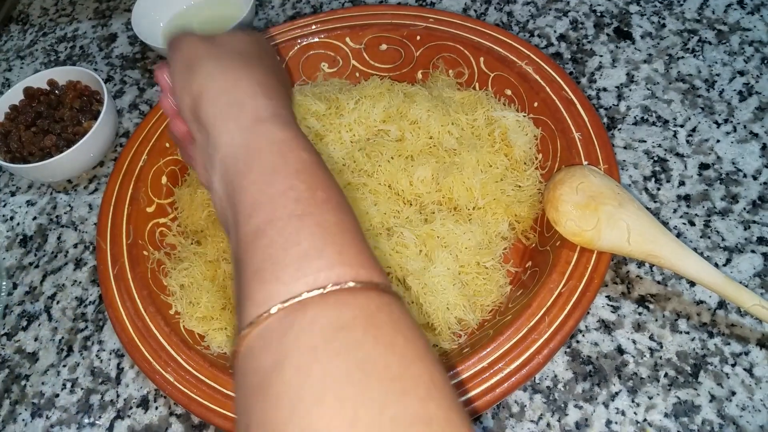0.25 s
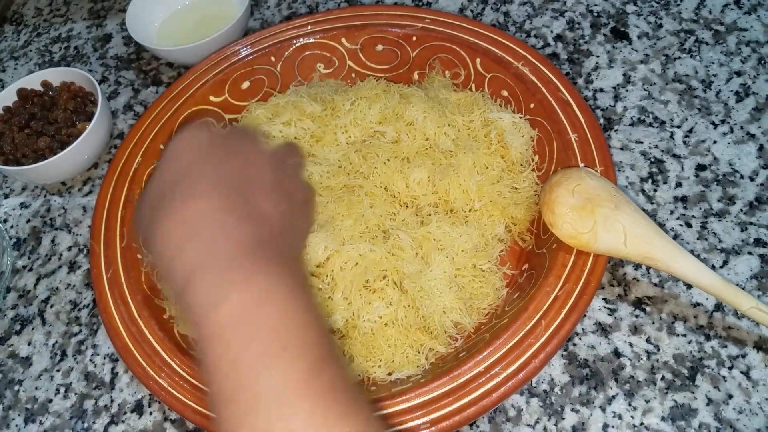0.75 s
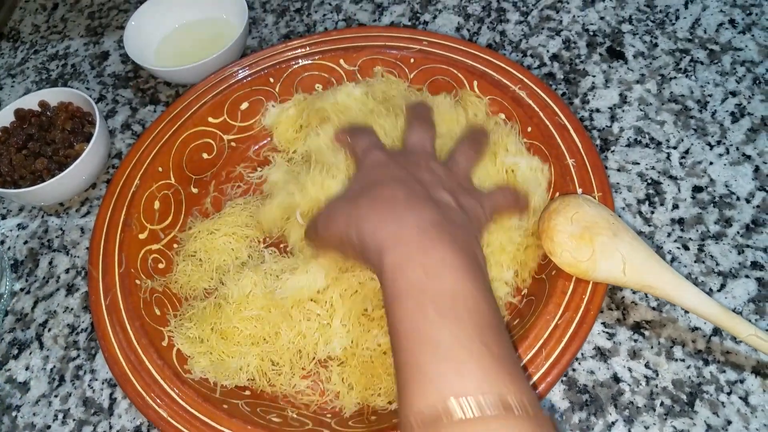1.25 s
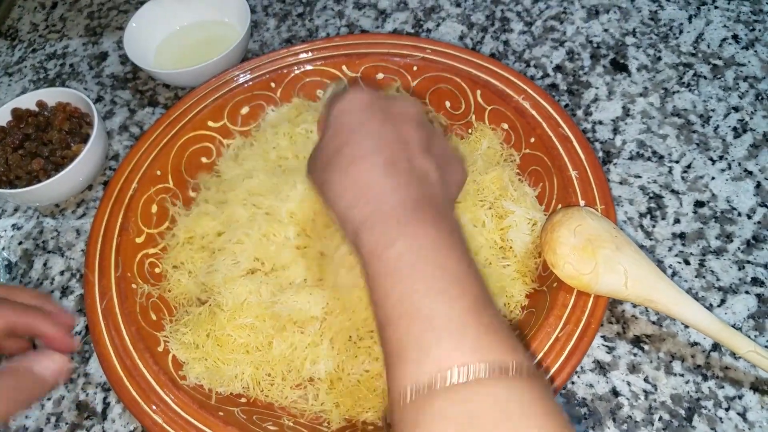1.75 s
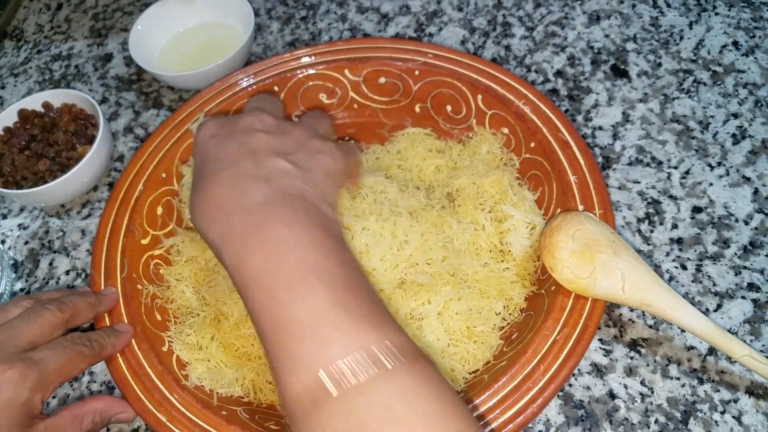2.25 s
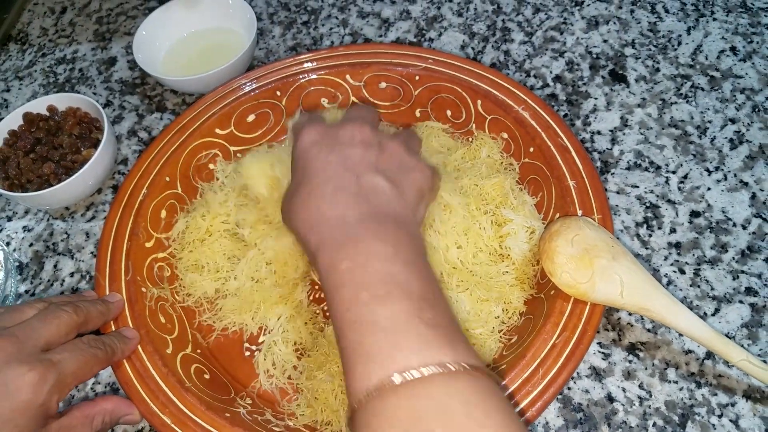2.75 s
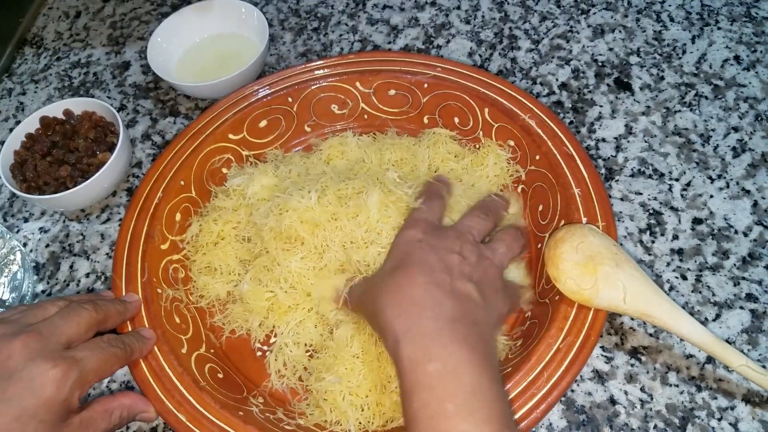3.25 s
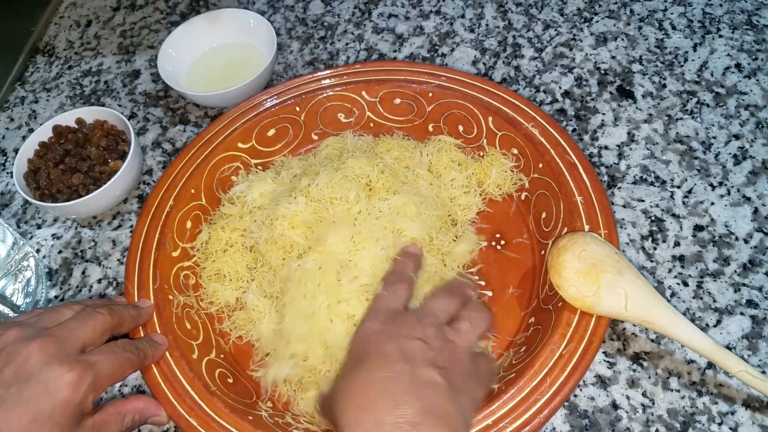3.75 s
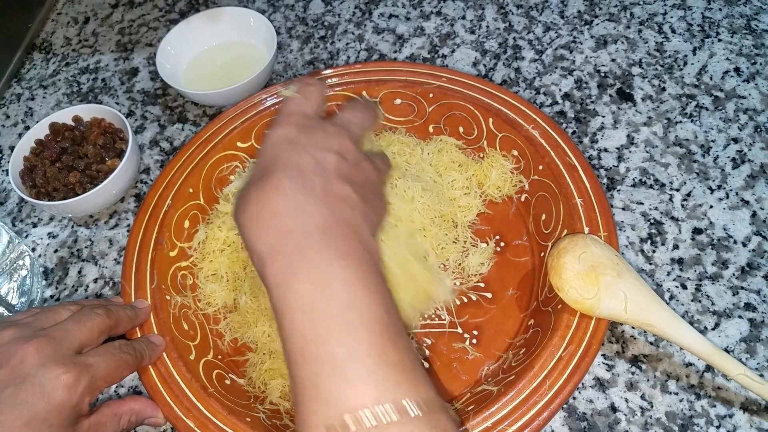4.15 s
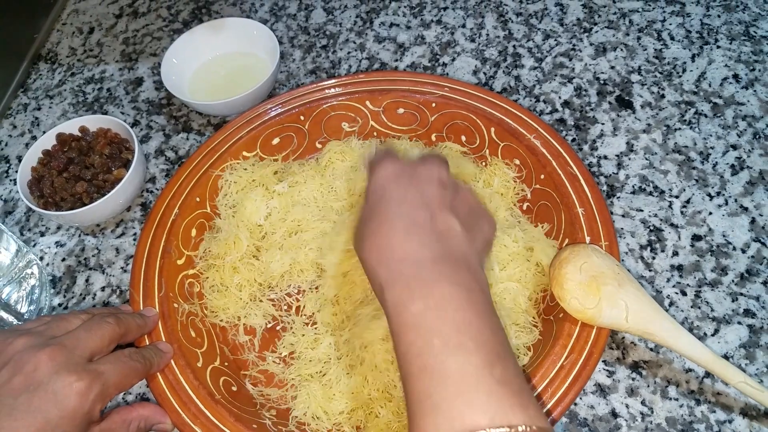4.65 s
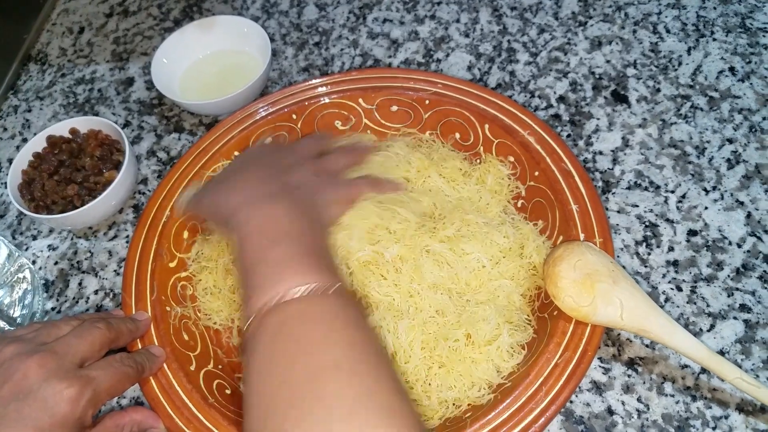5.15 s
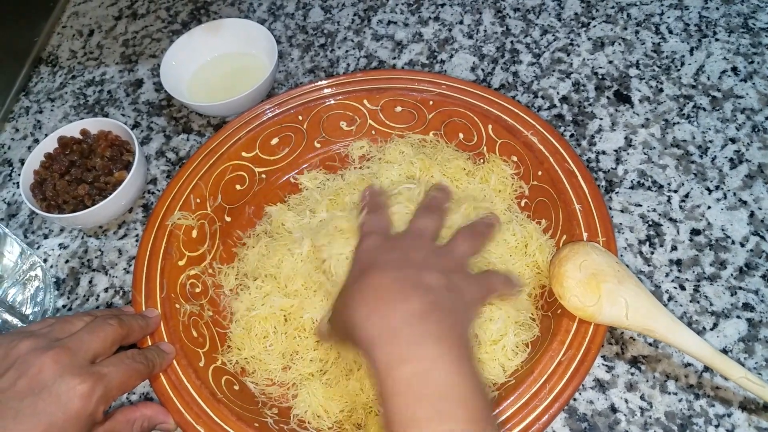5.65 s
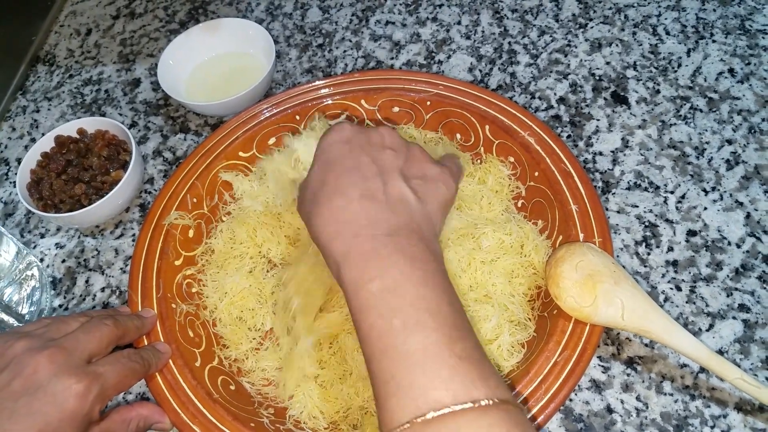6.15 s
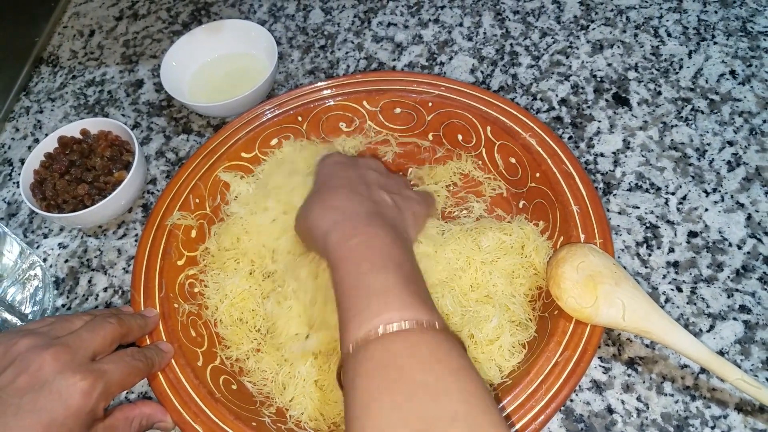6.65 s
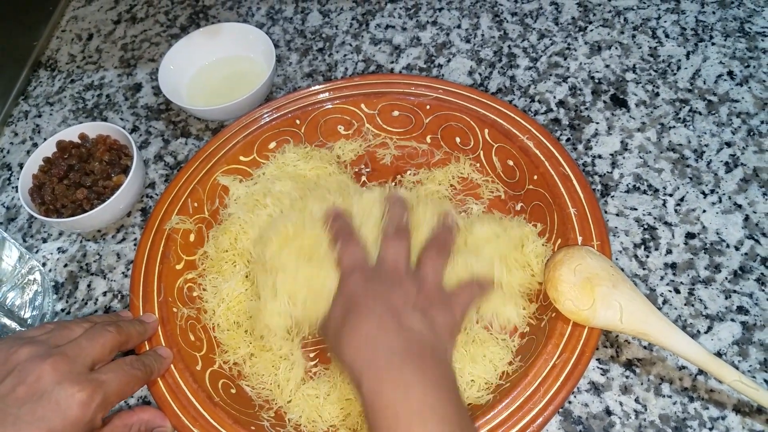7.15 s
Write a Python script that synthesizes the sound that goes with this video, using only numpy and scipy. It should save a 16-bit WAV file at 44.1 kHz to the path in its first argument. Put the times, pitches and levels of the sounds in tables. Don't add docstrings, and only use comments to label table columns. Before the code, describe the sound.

Pot and lid clank hard at the start, then quiet scrapes, rustles and finger taps on a clay dish, with a late bouncing thud.

```python
import sys
import numpy as np
from scipy import signal
from scipy.fft import rfft, irfft, next_fast_len
from scipy.io import wavfile
from scipy.ndimage import uniform_filter1d

SR = 44100
rng = np.random.default_rng(int(sys.argv[2]) if len(sys.argv) > 2 else 0)


def convert_level_to_amplitude(level_db):
    exponent = np.asarray(level_db, float) / 20
    return 10 ** exponent


def wav_out(sig):
    wavfile.write(sys.argv[1], SR, np.round(np.clip(np.atleast_2d(sig).T, -1, 1) * 32767).astype(np.int16))


N = 326117


def read(table, hz):
    table_hz, value = np.array(table)[:, 0], np.array(table)[:, 1]
    return np.interp(np.log(np.maximum(hz, 1)), np.log(table_hz), value)


def level(x, db):
    return x * convert_level_to_amplitude(db) / np.sqrt(np.mean(x ** 2))


def colour(x, table, size=16384):
    gain_db = read(table, np.fft.rfftfreq(size, 1 / SR))
    cepstrum = irfft(np.log(convert_level_to_amplitude(gain_db)), size)
    cepstrum[1:size // 2] *= 2
    cepstrum[size // 2 + 1:] = 0
    response = irfft(np.exp(rfft(cepstrum)), size)[:size // 2]
    whole = next_fast_len(x.shape[-1] + size // 2, real=True)
    return irfft(rfft(x, whole) * rfft(response, whole), whole)[..., :x.shape[-1]]


def walk(rate_hz):
    k = int(SR / rate_hz)
    held = np.repeat(rng.standard_normal(N // k + 1), k)
    return uniform_filter1d(uniform_filter1d(held, k), k)[:N]


def add(out, sound, start_s, peak_db, pan_db):
    i = int(start_s * SR)
    sound = sound[:, :N - i]
    sound = sound * convert_level_to_amplitude(peak_db) / np.abs(sound.mean(axis=0)).max()
    out[:, i:i + sound.shape[1]] += sound * convert_level_to_amplitude(np.array([[pan_db], [-pan_db]]) / 2)


# freq_hz, left_right_correlation
PORT_LIKENESS = [(60, 0.99), (130, 1), (290, 0.87), (640, 0.37), (1200, 0)]


def phase_apart(hz):
    return np.arccos(np.clip(read(PORT_LIKENESS, hz), 0, 1)) * np.array([[.5], [-.5]])


def diffuse(size, centres_hz):
    hz = np.fft.rfftfreq(size, 1 / SR)
    like = np.clip(read(PORT_LIKENESS, hz), 0, 1)
    mid, side = rfft(rng.standard_normal((2, size))) * np.sqrt([1 + like, 1 - like])
    both = np.array([mid + side, mid - side])
    shares = [read(list(zip(centres_hz, row)), hz) for row in np.eye(len(centres_hz))]
    return [irfft(both * share, size) for share in shares]


def ring(modes, t, swell_s):
    rows = np.array([(*mode, 0, 0)[:5] for mode in modes])
    hz, db, t60_s, split_hz, hush_s = rows.T[:, :, None, None]
    turn = rng.uniform(-0.9, 1, (len(modes), 4)).T[:, :, None, None]
    apart = phase_apart(hz) * np.sign(turn[0])
    waver = 1 + .45 * np.sin(2 * np.pi * 14 * turn[1] * t + np.pi * turn[2])
    beat = np.sin(np.pi * split_hz * (t - hush_s))
    settle_db = 9 * np.clip((t - .25) / .03, 0, 1)
    fade = convert_level_to_amplitude(db - 60 * t / np.minimum(t60_s, .7) - settle_db)
    tones = fade * np.where(split_hz > 0, beat, waver) * np.sin(2 * np.pi * hz * t + apart)
    return np.sum(tones, axis=0) * (1 - np.exp(-t / max(swell_s, 1e-4)))


# freq_hz, t60_s
ROOM_DECAY = [(60, 0.99), (250, 0.5), (1000, 0.4), (3000, 0.53), (8000, 0.55), (16000, 0.14)]


def room(crack_db, crack_s, tail_s):
    t = np.arange(int(tail_s * SR)) / SR
    bands = diffuse(len(t), np.array(ROOM_DECAY)[:, 0])
    tail = sum(band * convert_level_to_amplitude(-60 * t / t60_s) for band, (_, t60_s) in zip(bands, ROOM_DECAY))
    crack = convert_level_to_amplitude(crack_db) * np.sign(rng.standard_normal(len(t))) * np.exp(-t / crack_s)
    return tail * (1 - np.exp(-t / 0.00033)) + crack, t


NEAR_TAIL_S = .4


def knock(body, ring_db, swell_s, crack_db, tail_s=.7):
    modes, shape = body
    air, t = room(crack_db, .005, tail_s)
    return level(colour(air, shape), 0) + level(ring(modes, t, swell_s), ring_db)


# freq_hz, density_db
POT_WARE = [
    [(303, -17, 0.19), (353, -16.5, 0.72), (424, -40, 0.22), (482, -0.5, 0.14), (570, -30, 1), (695, -13, 0.56), (677, -25.5, 0.22), (1020, -25, 0.83), (1060, -31, 0.38), (1170, -44, 0.39), (1260, -17.5, 0.69), (1583, -41, 0.48), (1710, -35, 0.4), (1730, -32.5, 0.33), (1850, -34.5, 0.49), (2150, -21.5, 0.65), (3130, -21, 0.26), (3390, -27, 0.09), (3350, -30, 0.56), (4200, -41.5, 0.51), (4420, -32, 0.17), (5270, -46.5, 0.27)],
    [(40, -27), (120, -15), (250, -6.5), (400, -2.5), (1000, -3.5), (1400, -9.5), (2100, -12.5), (2500, -24), (3300, -32), (6000, -44), (16000, -62)],
]
LID_WARE = [
    [(104.4, -24.5, 0.28), (210, -14, 0.36), (358, 3, 0.13), (550, -6, 0.23), (620, -12, 0.3), (735, -8.5, 0.21), (840, -17, 0.52), (1010, 2, 0.11), (1200, -15, 0.088), (1340, -56, 0.93), (1404, -9.5, 0.21), (1544, -22, 0.32), (2019, -3, 0.14), (2160, -29.5, 0.76), (2630, -16.5, 0.14), (2570, -25, 0.29), (2790, -44, 0.36), (3270, -34, 0.36), (4030, -39, 0.49), (5240, -41, 0.27), (5950, -32, 0.13)],
    [(24, -69), (40, -36), (194, -10.5), (276, -15), (345, 0), (1440, -9.5), (1630, -21), (1760, -10.5), (2380, -27), (4000, -38.5), (16000, -63)],
]
THUD_WARE = [
    [(129.6, -7.5, 0.55), (231, -0.5, 0.31), (352, -15, 0.25), (443, -20, 0.23), (492, 0, 0.19), (556, -25, 0.38), (753, -6, 0.17), (700, -1, 0.17), (842, -9.5, 0.39), (1150, -26, 0.28), (1233, -3.5, 0.18), (2150, -21, 0.34), (2900, -38, 0.2), (3700, -32, .1)],
    [(24, -49), (40, -14), (119, -14), (419, -5), (490, 0), (559, -7.5), (1100, -14.5), (1770, -26.5), (3000, -37.5), (8000, -77), (10400, -101), (17600, -120)],
]
# pitch_hz, level_db, t60_s, split_hz, first_silence_s
POT_PAIRS = [(107.5, -12.5, 0.68, 9, -0.0054), (915.5, 1.5, 0.63, 8.2, 0.028),
             (1415, 7.7, 0.26, 6.9, -0.0074), (1820, -14.5, 0.75, 9.9, .001),
             (1989, -5, 0.51, 24.6, 0.0011)]
LID_PAIRS = [(1775, 0, 0.24, 11, .001), (1790, -23, 0.83, 6.6, .02)]
# start_s, peak_db, ring_db, swell_s, crack_db
KNOCK_EVENTS = [
    (0.33, -10.5, 2, 0.0066, 3.5),
    (0.709, -12, 0.5, 0.0042, 10),
    (5.189, -23.5, -2, 0.0026, 9),
]
KNOCK_PANS = -0.5, 0.7, 1
# start_s, peak_db
THUD_BOUNCES = [
    (5.209, -29),
    (5.219, -31),
    (5.25, -30.5),
    (5.276, -34),
]


def crockery(out):
    pot = POT_WARE[0] + POT_PAIRS, POT_WARE[1]
    lid = LID_WARE[0] + LID_PAIRS, LID_WARE[1]
    for body, pan_db, event in zip((pot, lid, THUD_WARE), KNOCK_PANS, KNOCK_EVENTS):
        start_s, peak_db, ring_db, swell_s, crack_db = event
        add(out, knock(body, ring_db, swell_s, crack_db), start_s, peak_db, pan_db)
    for start_s, peak_db in THUD_BOUNCES:
        bounce = knock(THUD_WARE, ring_db=-21, swell_s=.004, crack_db=28, tail_s=NEAR_TAIL_S)
        add(out, bounce, start_s, peak_db, KNOCK_PANS[2])


# start_s, peak_db, pitch_hz, t60_s, pan_db
KNUCKLE_BUMPS = [(0.2945, -51.5, 700, 0.03, 5), (2.129, -52, 785, 0.098, 8), (3.683, -49.5, 443, 0.11, -3),
                 (3.724, -46.5, 1106, 0.074, -2), (4.387, -47, 514, 0.32, 12),
                 (4.468, -44.5, 484, 0.059, 8), (6.408, -50, 530, 0.063, 14), (6.477, -42.5, 505, 0.093, 9),
                 (6.521, -39.5, 480, 0.054, 5)]
WARE_RATTLES = [(.395, -30, 613, 0.083, 1), (.47, -36, 607, .12, 0.92), (.505, -31, 520, 0.058, 1),
                (.545, -41, 560, 0.27, 1), (.726, -33, 507, 0.11, 1), (.752, -30.5, 700, 0.087, 0.9),
                (.775, -33.5, 807, 0.072, 1), (.797, -33.5, 600, 0.11, 1)]


def bumps(out):
    for start_s, peak_db, pitch_hz, t60_s, pan_db in KNUCKLE_BUMPS + WARE_RATTLES:
        modes = [(pitch_hz, 0, min(t60_s, .15))]
        shape = [(pitch_hz / 3, -20), (pitch_hz, 0), (pitch_hz * 3, -14), (16000, -50)]
        sound = knock((modes, shape), 4.5, 0.00045, 12.0, NEAR_TAIL_S)
        add(out, sound, start_s, peak_db, .5 * pan_db)


# start_s, peak_db, pitch_hz, cycles, pan_db
CONTACT_PLOCKS = [(2.639, -47, 860, 5.1, 4), (2.656, -54, 1590, 11, -2), (2.711, -53, 700, .8, 1),
                  (3.299, -56, 1540, 24, -8), (3.3157, -42.5, 1550, 18, -9), (3.337, -43, 860, 2.2, 5),
                  (3.726, -46, 1110, 3, -2), (3.8338, -48, 1566, 18, -10), (4.388, -60, 910, 1.4, 6),
                  (4.469, -48, 794, 2, 2), (5.186, -40, 400, 0.92, 1), (5.2082, -30, 420, 1.1, 8),
                  (5.251, -34, 700, 1.7, 2), (6.594, -34, 840, 1.8, 6), (6.5997, -23.5, 1640, 1.9, 11.5),
                  (6.607, -36, 1700, 3, 5), (6.614, -29, 850, 3.8, 2), (6.614, -30, 1710, 3.3, 11),
                  (6.627, -39, 890, 4.1, -5), (6.644, -49, 1640, 31, 6), (6.691, -53, 1640, 46, 4),
                  (2.632, -51, 2520, 42, 4), (3.317, -43.5, 2510, 17, 6), (3.836, -49, 2490, 17, 1),
                  (6.522, -48, 1200, 6.1, -4), (.2955, -53, 2500, 1.5, 2), (.9, -56, 1780, 88, -4),
                  (.835, -53, 1776, 61, 3), (3.331, -54.5, 2484, 90, 3), (3.727, -63, 2150, 52, 4),
                  (3.87, -64, 2520, 64, -1), (6.598, -47, 3670, 42, 14), (6.604, -43.5, 4280, 28, 4),
                  (6.681, -53, 2520, 32, -6), (6.601, -39, 2520, 13, 8), (5.217, -34, 1390, 3, -1),
                  (5.253, -46, 1270, 4, -1), (5.277, -45, 1200, 3, 0), (1.991, -45, 1100, 2.5, 1),
                  (6.53, -56, 2930, 14, -1),
                  (0.33, -13, 1003, 4, -5), (.3305, -15.5, 460, 1.2, -9), (.334, -15, 428, 3.7, 2.5),
                (.339, -15.5, 860, 4, 3), (.7115, -16, 408, 2.05, 1), (.712, -25.5, 980, 5.6, 3),
                (.7165, -14.5, 830, 2, -1), (.722, -27.5, 480, 7.1, -3), (.7265, -23.5, 560, 3, 0),
                (5.189, -25.5, 515, 12.6, 2), (5.19, -32, 710, 9.1, 2), (5.212, -31.5, 750, 5.6, 1),
                (5.222, -31.5, 351.4, 20, 1), (5.252, -37, 485, 14, 3), (4.85, -65.5, 940, 99, 2),
                (6.64, -54, 4300, 40, 2), (6.6, -47, 5300, 30, 3), (.331, -47.5, 6100, 75, 1),
                (.331, -45.5, 4550, 62, 4), (0.38, -54, 5200, 80, -4), (.7095, -50.5, 4510, 45, 2),
                (4.39, -56, 4200, 8, 0), (4.369, -60, 11500, 3, 3), (.8, -39, 800, 11, -2)]


def plocks(out):
    t = np.arange(SR // 6) / SR
    for start_s, peak_db, pitch_hz, cycles, pan_db in CONTACT_PLOCKS:
        turns = t * pitch_hz
        apart = 0.68 * phase_apart(pitch_hz)
        envelope = np.exp(-turns / max(cycles, .3)) * (1 - np.exp(-turns / 0.41))
        add(out, np.sin(2 * np.pi * turns + apart) * envelope, start_s, peak_db, pan_db)


# start_s, peak_db
CHINK_EVENTS = [
    (0.619, -59),
    (0.629, -52.5),
    (.637, -54),
]
# pitch_hz, level_db, t60_s
CHINK_MODES = [(4300, -16, 0.03), (5150, -19, 0.035), (6900, -18, 0.017), (10000, -18, 0.02),
               (10700, -19, .02)]


def chinks(out):
    t = np.arange(SR // 4) / SR
    modes = [(hz, db, min(t60_s, .04)) for hz, db, t60_s in CHINK_MODES]
    for start_s, peak_db in CHINK_EVENTS:
        add(out, ring(modes, t, 0.002), start_s, peak_db, 2.5)


def tap(body, ring_db, tilt_db, low_db, crack_db):
    peaks, shape = body
    air, t = room(crack_db, 1 / SR, NEAR_TAIL_S)
    air = air * convert_level_to_amplitude(-90 * t)
    modes = []
    for k, (hz, width_hz, db) in enumerate(peaks):
        t60_s = 1.5 / width_hz
        modes.append((hz, db + low_db * (k == 0) - 20 * np.log10(t60_s), t60_s))
    rung = signal.fftconvolve(air, ring(modes, t[:SR // 8], 0.000072), axes=1)[:, :len(t)]
    blow = level(colour(air, shape), 0) + level(rung, ring_db)
    return colour(blow, [(800, 0), (12800, 4 * tilt_db)])


# freq_hz, density_db
DISH_WARE = [
    [(885, 180, -6.5), (1606, 45, -1.5), (2520, 90, -10.5), (2720, 8.3, -10), (2960, 200, -17), (3670, 53, -14), (4260, 180, -21), (5380, 140, -24), (6960, 170, -33), (7800, 56, -32), (8550, 120, -32), (10200, 110, -44), (11800, 90, -26), (13500, 150, -38)],
    [(120, -23), (200, -16), (623, -17), (806, -0.5), (1080, -17.5), (1590, -9), (2130, -14.5), (2560, -26.5), (2860, -31.5), (4270, -31), (16000, -37.5)],
]
SPOON_WARE = [
    [(1243, 41, 1), (2150, 44, 5.5), (2980, 75, -7.5), (3670, 60, -10), (4370, 60, -14), (5360, 46, -17), (7470, 32, -20), (8600, 44, -25), (9800, 30, -32), (11400, 46, -19)],
    [(80, -3), (500, -2.5), (1200, -5), (3000, -24), (16000, -41)],
]
# start_s, peak_db, ring_db, tilt_db_per_octave, low_mode_db
DISH_TAPS = [(2.617, -57, 8, 10, -3), (2.632, -38.5, -3, 2, -2), (2.659, -38.5, 0, -0.5, -1),
             (3.315, -37, 6, -2.5, -2.5), (3.338, -44, 1, 4, 6), (3.834, -39, 4, 1.5, 5),
             (6.594, -35, 6, 6, -1), (6.599, -23, -1, 4, -8), (6.614, -27.5, 4, 0.5, -2)]
SPOON_ROCKS = [(1.947, -38.5, -1, 1, 0.3), (1.953, -39, -0.74, -0.3, 0.3), (1.958, -38, -1, 0.12, .3),
               (1.964, -39, -1.4, 0.07, 0.3), (1.991, -33.5, 0, -1.1, 0.3)]


def taps(out):
    for body, events, crack_db in ((DISH_WARE, DISH_TAPS, 29.5), (SPOON_WARE, SPOON_ROCKS, 26)):
        for start_s, peak_db, ring_db, tilt_db, low_db in events:
            add(out, tap(body, ring_db, tilt_db, low_db, crack_db), start_s, peak_db, 1.5)


# start_s, peak_db, pitch_hz, cycles, pan_db
STRAND_TICKS = [(0.0953, -39.5, 6250, 0.27, 16), (0.183, -43, 12800, 5, 16), (0.2088, -47.5, 9200, 3, 13),
                (0.528, -50.5, 10000, 3, 15), (4.1805, -44, 10800, 0.57, 21), (4.286, -38, 12600, 0.72, 17),
                (4.329, -47, 14500, 1.7, 2.0), (5.435, -48, 12400, 1.4, 3), (5.7607, -40, 15300, 1.2, 3.0),
                (6.1758, -53.5, 8800, 1.2, 13.5), (6.3688, -51, 14000, 1.5, 2),
                (0.2355, -57, 4800, 4, 1), (.26, -65, 5000, 35, 1), (.263, -59, 10500, 9, 1),
               (.286, -49, 11500, 4, 3), (0.2454, -57, 6300, 9, -1), (0.296, -50, 4850, 3, 3),
               (1.727, -62, 5890, 9, -6), (2.4867, -59, 6260, 9, -2.5), (3.481, -59, 7500, 9, 0)]


def strands(out):
    t = np.arange(SR // 25) / SR
    for start_s, peak_db, pitch_hz, cycles, pan_db in STRAND_TICKS:
        grain = np.sin(2 * np.pi * pitch_hz * t) * np.exp(-t * pitch_hz / max(cycles, .3))
        smear = convert_level_to_amplitude(-33) * rng.standard_normal((2, len(t))) * np.exp(-t / .008)
        tick = colour(grain + smear, [(pitch_hz / 2.2, -30), (pitch_hz / 1.3, 0)])
        add(out, tick, start_s, peak_db, pan_db)


def grit(rate_hz, spread_db):
    chance = rng.uniform(-1, 1, (2, N)) * SR / rate_hz
    hit = np.abs(chance) < 1
    size = np.minimum(-np.log(np.abs(chance[hit]) + 1e-9), 3)
    out = np.zeros((2, N))
    out[hit] = np.sign(chance[hit]) * convert_level_to_amplitude(spread_db * size)
    return out


# top_s, scrape_db, toss_db, length_s
JAB_STROKES = [(.2, -89, -66.5, 1), (1.35, -59.5, -75, 0.25), (1.72, -68, -73, 0.13),
               (1.96, -65, -62, 0.096), (2.49, -75, -69, .07), (3.32, -50, -59, 0.12),
               (3.48, -78, -72, 0.1), (3.73, -60, -70, 0.25), (3.835, -60.5, -65, 0.29),
               (4.19, -60, -69, 0.087), (4.34, -61, -64, 0.22), (4.47, -62, -83, 0.12),
               (5.77, -57.5, -75, 0.098), (6.48, -60, -63, 0.07), (6.6, -48, -59, 0.25),
               (7.18, -55, -71.5, 0.32)]
SWEEP_STROKES = [(1.04, -68.5, -70.5, 0.33), (1.57, -85, -71, 0.66), (2.14, -58, -68, 0.3),
                 (2.26, -79, -73, 0.11), (2.65, -46.5, -63, 0.13), (3.64, -62, -93, 0.19),
                 (4.04, -82, -72, 0.19), (4.57, -61.5, -72.5, 0.29), (4.91, -70, -84.5, .15),
                 (5.31, -56, -63, 0.38), (5.87, -59, -70, 0.25), (6.02, -64.5, -75, 0.18),
                 (6.52, -54.5, -63, 0.1), (7.35, -80, -75, .15), (6.67, -68, -66, 0.21)]


def effort(t, column, rest_db):
    edge_db = -23
    power = convert_level_to_amplitude(2 * rest_db)
    for strokes, rise in ((JAB_STROKES, 0.17), (SWEEP_STROKES, 0.58)):
        for stroke in strokes:
            late = (t - stroke[0]) / stroke[3]
            fall = np.maximum(-late / rise, late / (1 - rise))
            power = power + convert_level_to_amplitude(2 * (stroke[column] + edge_db * fall))
    return np.sqrt(power)


# pitch_hz, width_hz, level_db
GLAZE_MODES = [(860, 290, 9.5), (1558, 200, -5.5), (2410, 61, -18), (2940, 110, -12.5), (3750, 170, -30),
               (4300, 220, -18)]
# freq_hz, density_db
STRAND_RUSTLE = [(1500, -13.5), (3500, -4.5), (6000, -11), (9000, -11), (16000, -17)]


def hand():
    t = np.arange(N) / SR
    slow = t[::64]
    rub = np.interp(t, slow, effort(slow, column=1, rest_db=-69.5))
    toss = np.interp(t, slow, effort(slow, column=2, rest_db=-78))
    body = ring([(hz, db, 2.1 / width_hz) for hz, width_hz, db in GLAZE_MODES], t[:SR // 5], 0.00015)
    scrape = level(signal.fftconvolve(grit(1500, 4.5), body, axes=1)[:, :N], 0)
    scrape = scrape + level(colour(grit(3400, 3.6), DISH_WARE[1]), -3.5)
    rustle = level(colour(grit(4000, 4.4), STRAND_RUSTLE), 0.62)
    fizz = level(colour(grit(5000, 2.5), [(7000, -42), (12000, 6.5), (16000, -8.5)]), -11.0)
    scraping = scrape * rub * convert_level_to_amplitude(3.4 * walk(25.88))
    return scraping + (rustle + fizz) * toss * convert_level_to_amplitude(2.6 * walk(30))


# freq_hz, density_db
RUMBLE = [(12, -35), (22, -7), (48, -13), (79, -4.5), (100, -0.5), (121, -4), (166, -12), (252, -4.5),
          (320, -7.5), (387, -9.5), (440, -14), (491, -11), (585, -15), (644, -17.5), (900, -18.5),
          (1170, -65.5), (1980, -120)]
# freq_hz, density_db
MIC_HISS = [(410, -35.5), (700, -15), (829, -5), (1090, -11), (1260, -2), (1570, -8), (2040, -9),
            (3020, -8.5), (3440, -13.5), (4950, -21.5), (8450, -23.5), (9500, -30), (13900, -20.5),
            (15800, -21.5)]
BAND_FLICKER = 1.5, 1.5, 2.5, 3, 3, 2.5, 2, 1.5, 1.2, 1.2


def air():
    swell = walk(0.88)
    centres_hz = 30 * 2. ** np.arange(10)
    bands = [band[:, :N] for band in diffuse(2 * next_fast_len(N // 2 + 1), centres_hz)]
    noise = sum(band * convert_level_to_amplitude(0.12 * swell + flicker_db * walk(9))
                for band, flicker_db in zip(bands, BAND_FLICKER))
    return level(colour(noise, RUMBLE), -57.5) + level(colour(noise, MIC_HISS), -63.5)


# multiple, level_db
MOTOR_OVERTONES = [(5, -63.5), (7, -89.5), (9, -67.5), (10, -76), (12, -73.5)]


def fridge():
    motor_hz, mains_hz = 49.15, 100.0
    turn = 2 * np.pi * motor_hz * np.cumsum(1 + 0.0014 * walk(1.37)) / SR
    mains = 2 * np.pi * mains_hz * np.arange(N) / SR
    hum = convert_level_to_amplitude(-60.3 + 2.2 * walk(6.18)) * (np.sin(mains) + convert_level_to_amplitude(-16.0) * np.sin(3 * mains))
    for k, db in MOTOR_OVERTONES:
        hum = hum + convert_level_to_amplitude(db + 1.6 * walk(5)) * np.sin(k * turn + k * k)
    return np.sqrt(2) * hum


def scene():
    out = air() + fridge() + hand()
    for source in (crockery, bumps, plocks, chinks, taps, strands):
        source(out)
    return out


def low_pass(x):
    return signal.sosfilt(signal.butter(12, 16660, fs=SR, output="sos"), x)


# freq_hz, difference_db
PORT_COLOUR = [(60, -0.5), (110, -1), (200, -4.5), (380, 0), (700, -2.5), (1290, -3), (2380, -3),
               (4400, -5.5), (8120, -4), (15000, 4)]


def record(dry):
    left = colour(dry[0], [(hz, db / 2) for hz, db in PORT_COLOUR])
    right = colour(dry[1], [(hz, -db / 2) for hz, db in PORT_COLOUR])
    both = colour(np.array([left, right]), [(15900, 0), (16050, -32), (16700, -45)])
    return low_pass(both)


dry = scene()
out = record(dry)
wav_out(out)
```